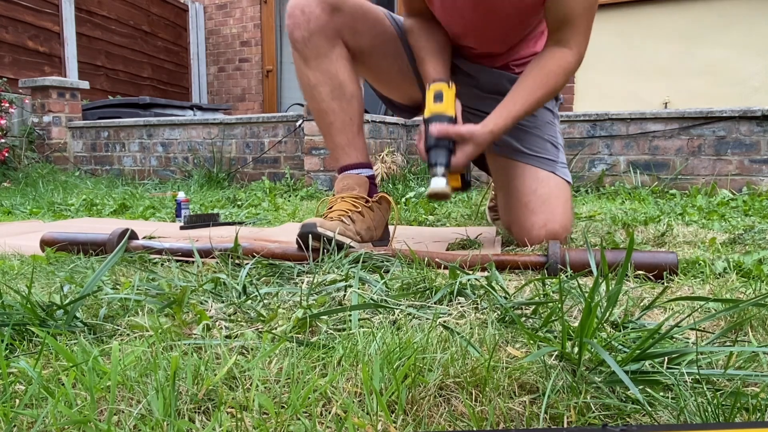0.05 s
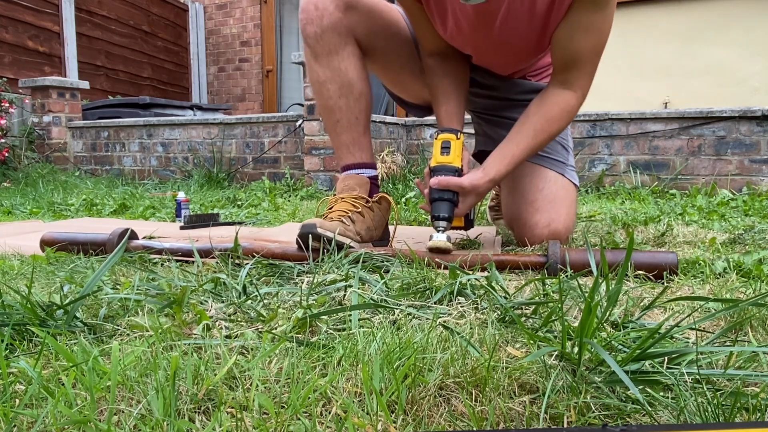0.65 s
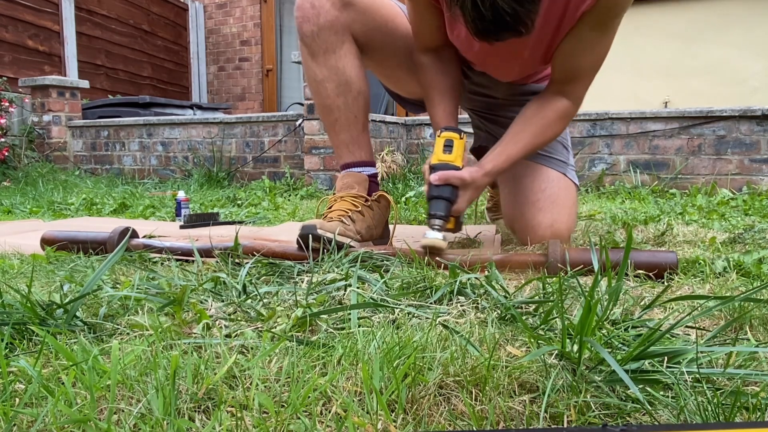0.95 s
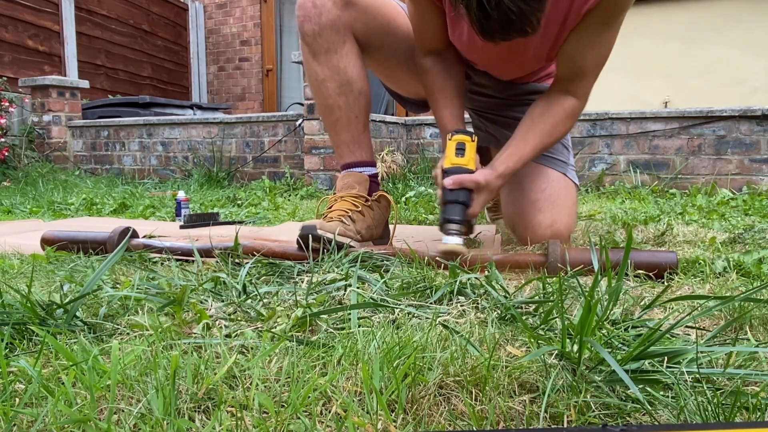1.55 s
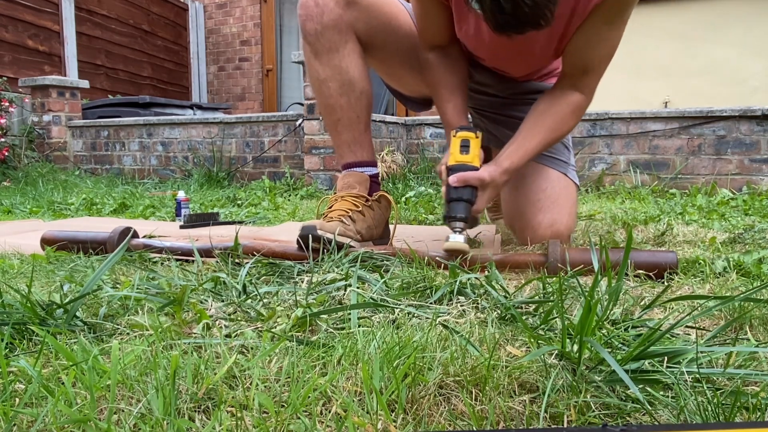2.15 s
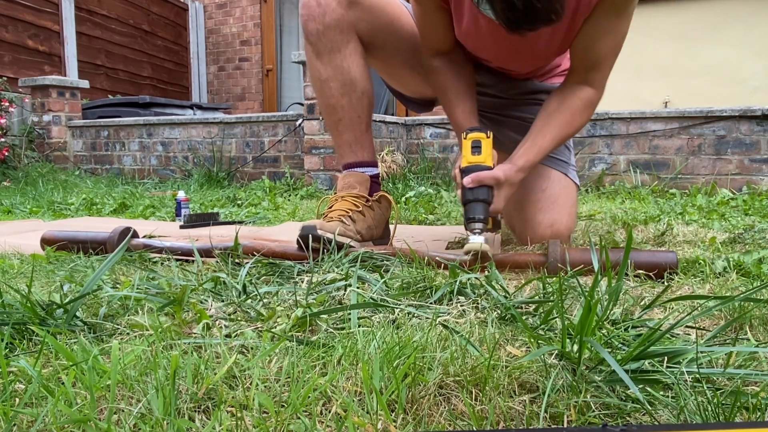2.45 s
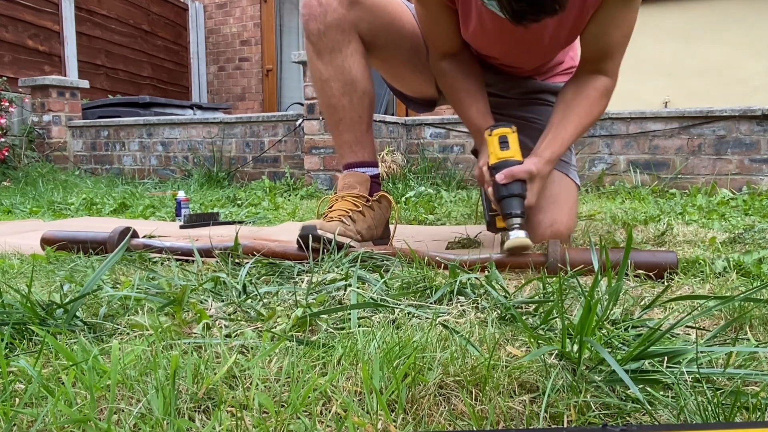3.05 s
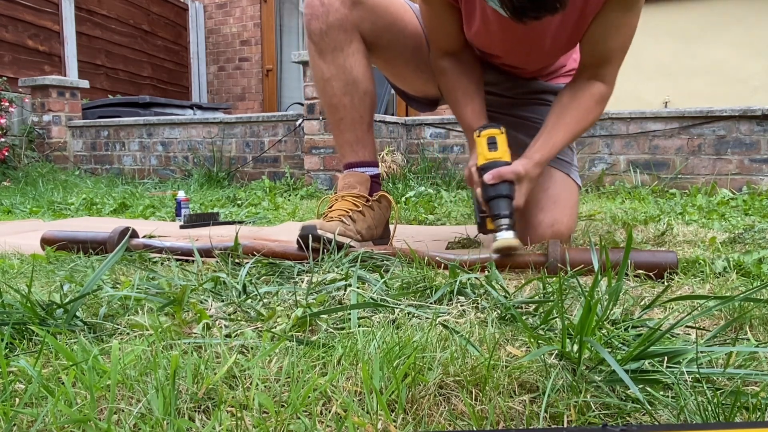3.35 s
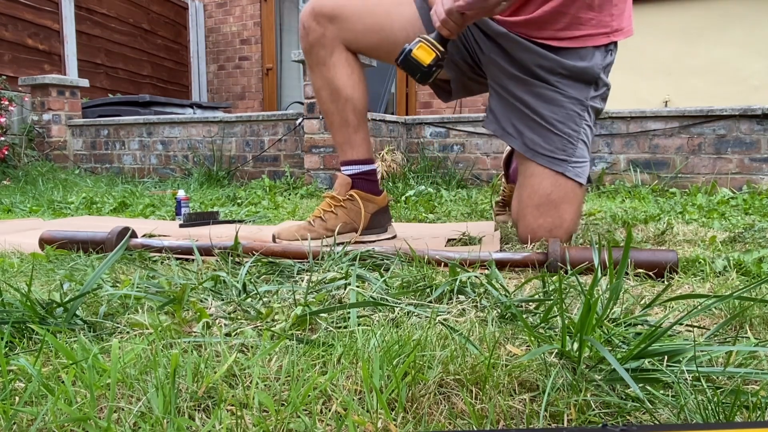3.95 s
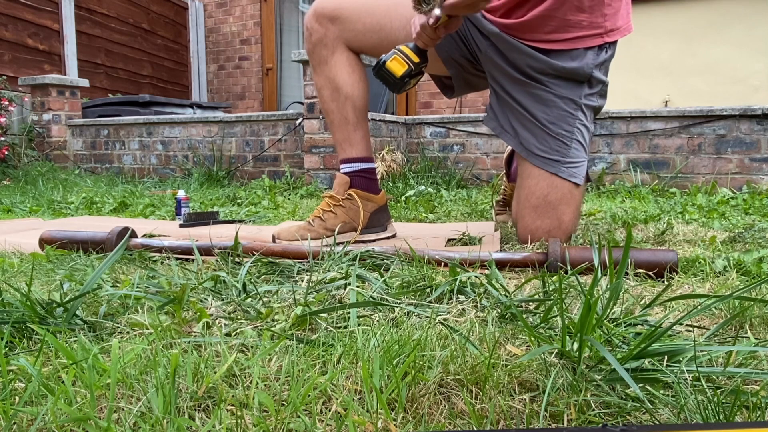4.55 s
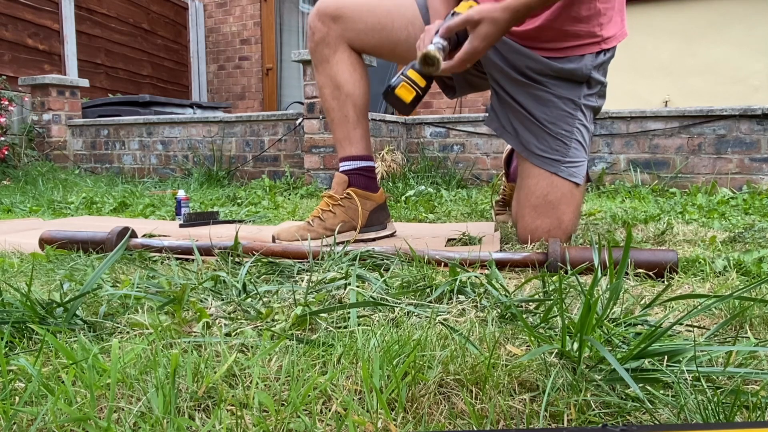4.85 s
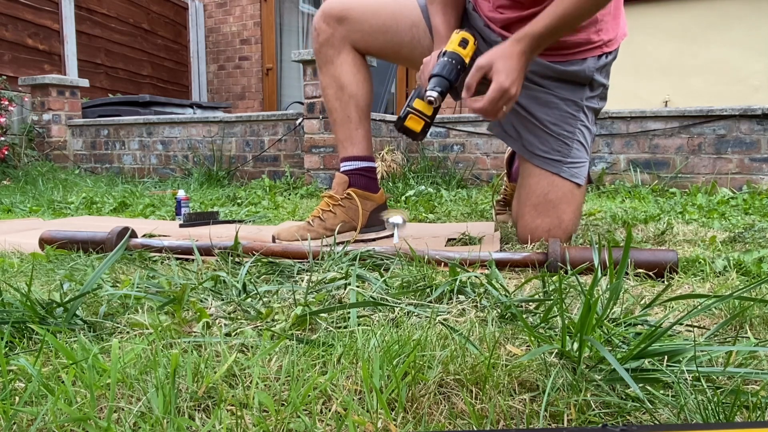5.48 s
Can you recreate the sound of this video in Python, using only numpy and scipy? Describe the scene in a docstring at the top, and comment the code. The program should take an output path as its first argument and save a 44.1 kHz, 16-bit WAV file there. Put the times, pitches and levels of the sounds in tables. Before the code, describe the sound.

Close to the microphone in a garden, a cordless drill starts with a click and runs for about three seconds, its high, wavering whine mixed with the gritty rasp of wire bristles on steel. It catches briefly with a rough tearing sound, then eases off and stops. Three quiet, clicking turns of the chuck follow, and the loose brush lands on a board with a thud and short metallic ring. Far traffic rumbles faintly.

```python
"""A garden, distant traffic rumbling; close to a stereo microphone, a rusty steel tube on a board.
Clothes rustle, a trigger clicks, and a cordless drill scours the tube with a wire cup brush, its motor
whining and throbbing under the uneven load. Once the brush snags on the board; later it lifts off and
runs free. The drill stops, the chuck is opened in three twists, and the brush drops on the board."""
import sys
import numpy as np
from scipy import signal
from scipy.fft import rfft, irfft, next_fast_len
from scipy.io import wavfile

SR = 44100
rng = np.random.default_rng(int(sys.argv[2]) if len(sys.argv) > 2 else 0)


def wav_out(sig):
    """Save sig, one row per channel (or a flat mono array), as 16-bit PCM at SR to the path in sys.argv[1]."""
    wavfile.write(sys.argv[1], SR, np.round(np.clip(np.atleast_2d(sig).T, -1, 1) * 32767).astype(np.int16))


N = 243431

TRIGGER_ON_S, TRIGGER_OFF_S = 0.821, 3.688
SNAG_START_S, SNAG_END_S = 1.541, 1.672
# the motor under the hand's pressure: time_s, pitch_hz, level_db, swing_hz (within a turn of the brush)
MOTOR_LOAD = [(0.825, 4170, -32, 10), (0.865, 3980, -35, 37), (1.0, 3924, -45, 26), (1.1, 3864, -40.3, 14),
              (1.28, 3993, -36.5, 44), (1.47, 3922, -39.0, 100), (1.6, 3933, -40.5, 10.2),
              (1.87, 4008, -33.5, 41), (1.98, 3903, -37, 5.6), (2.26, 4016, -34, 44), (2.38, 3870, -39, 8),
              (2.55, 4037, -34, 18.2), (2.8, 3937, -35.5, 18), (3.0, 3996, -36.5, 28),
              (3.23, 4002, -39, 47), (3.31, 3806, -40.5, 7.3), (3.35, 3640, -60, 24), (3.45, 4090, -49, 26),
              (3.55, 3790, -59, 15)]


def from_db(db):
    return 10 ** (np.asarray(db) / 20)


def rms_one(x):
    return x / np.sqrt(np.mean(x ** 2) + 1e-20)


def clock():
    return np.arange(N) / SR


def in_time(rows):
    """One curve for each column after the time."""
    times, *columns = np.transpose(rows)
    return [np.interp(clock(), times, column) for column in columns]


def between(start, end, fade):
    """One between two times, with short ramps outside."""
    return np.clip(1 + np.minimum(clock() - start, end - clock()) / fade, 0, 1)


def swell(start, length, rise_share, edge_db, attack_s=.012, release_s=.035):
    """Gain of a movement: it starts briskly, swells by edge_db and stops more softly."""
    since = clock() - start
    from_peak = np.interp(since / length, [0, rise_share, 1], [-1, 0, 1])
    gate = np.clip(1 + np.minimum(since / attack_s, (length - since) / release_s), 0, 1)
    return from_db(-edge_db * from_peak ** 2) * gate


def noise():
    """Two unrelated rows: sound common to both microphone ports, and sound that differs between them."""
    return rng.standard_normal((2, N))


def drift(rate_hz):
    """Slow wander with spread 1: random points, two for each cycle, joined by lines."""
    points = rng.standard_normal(N // 20)
    return rms_one(np.interp(clock() * 2 * rate_hz, np.arange(len(points)), points))


def grains(per_s, spread_db):
    """Tiny contacts at random times, with uneven strength."""
    sizes = from_db(spread_db * np.minimum(rng.exponential(1, (2, N)), 4)) * np.sign(noise())
    return rms_one(sizes * (rng.random((2, N)) < per_s / SR))


def impulses(rows):
    blows = np.zeros(N)
    for start_s, level_db in rows:
        blows[round(start_s * SR)] += from_db(level_db)
    return blows


def bursts(rows, t60_s):
    """A dying puff of noise for each contact."""
    decay = from_db(-60 / (t60_s * SR))
    return noise() * signal.lfilter([1], [1, -decay], impulses(rows) + 1e-18)


def coloured(x, tone, size=8192):
    """Minimum-phase filter of unit power gain: the tone table sets only the spectrum's shape."""
    hz = np.maximum(np.arange(size // 2 + 1) * SR / size, 1)
    tone_hz, tone_db = np.transpose(tone)
    gain = rms_one(from_db(np.interp(np.log(hz), np.log(tone_hz), tone_db)))
    cepstrum = irfft(np.log(gain))
    cepstrum[1:size // 2] *= 2
    cepstrum[size // 2 + 1:] = 0
    response = irfft(np.exp(rfft(cepstrum)))
    return signal.oaconvolve(x, response[None], axes=1)[:, :N]


def resonance(x, hz, width_hz):
    return signal.lfilter(*signal.iirpeak(hz, hz / width_hz, fs=SR), x)


def ring(rows, modes):
    """Each blow sets every mode ringing with a strength of its own."""
    out = 0
    for hz, mode_db, t60_s in modes:
        decay, step = from_db(-60 / (t60_s * SR)), 2 * np.pi * hz / SR
        blows = impulses([(s, db + mode_db + rng.normal(0, 1.4)) for s, db in rows]) + 1e-18
        out = out + signal.lfilter([0, np.sin(step)], [1, -2 * decay * np.cos(step), decay ** 2], blows)
    return out


def widen(x, side_db):
    """Common and differing sound to left and right."""
    return x[0] + from_db(side_db) * np.array([x[1], -x[1]])


def microphone_ports(x):
    """Close sound reaches the two ports out of step; scatter from the ground makes them less alike."""
    # the drill at the microphone: frequency_hz, left_lead_rad, left_over_right_db, likeness (0-1)
    arrival = [(100, .1, -2, .9), (650, .9, 3, .7), (1150, -.8, 3, .75), (1800, .1, -2.5, .92),
               (2500, 1.1, -3, .7), (4000, 2, -4, .7), (4900, 2.6, -3, .3), (5600, 4, 0, .25),
               (6500, 5.2, -3.5, .5), (8200, 3.14, 0, .85), (11000, 0, 0, .9), (13500, -3.14, 0, .85),
               (16000, -6.5, 0, .85)]
    size = 2 * next_fast_len(N // 2 + SR // 4, True)
    hz = np.arange(size // 2 + 1) * SR / size
    table_hz, *columns = np.transpose(arrival)
    lead, balance_db, alike = [np.interp(hz, table_hz, column) for column in columns]
    common, differing = rfft(x, size)
    side = np.array([[1], [-1]])
    pair = np.sqrt((1 + alike) / 2) * common + side * np.sqrt((1 - alike) / 2) * differing
    return irfft(pair * np.exp(.5j * side * lead) * from_db(side * balance_db / 2))[:, :N]


def open_air(level_db=-72):
    """Steady faint hush all around, unrelated at the two ports."""
    # spectrum of the hush: frequency_hz, level_db
    hush_tone = [(100, -1), (500, -1), (1000, -6.5), (2000, -16.5), (5000, -21.5), (11000, -27.5),
                 (16000, -40)]
    return from_db(level_db) * coloured(noise(), hush_tone)


def distant_traffic(gain_db=4, left_db=-4):
    """A low rumble from far off, nearly alike at both ports."""
    # level of the low background rumble, which steps up as the drill starts, then wavers: time_s, level_db
    rumble_level = [(0, -64), (.7, -63.5), (.95, -54.5), (3.6, -57.5), (4.05, -59.5), (4.55, -56.5),
                    (4.9, -61), (5.5, -54.5)]
    # spectrum of the rumble: frequency_hz, level_db
    rumble_tone = [(20, -37), (35, -8.5), (50, -3.5), (65, 4), (85, -2), (110, -0.5), (160, -13.5),
                   (250, -23), (500, -38.5), (1000, -52), (4000, -76)]
    rumble = widen(coloured(noise(), rumble_tone), side_db=-10)
    return from_db(gain_db + in_time(rumble_level)[0]) * rumble * from_db([[left_db], [0]])


def garden_echoes(x, tail_db=-20.5, tail_t60_s=.33):
    """The direct sound, a few wall echoes that cross sides, and a faint tail from the yard."""
    # house and garden walls: delay_s, level_db
    walls = [(.017, -20.5), (0.028, -24.5), (.043, -29.5)]
    out = x.copy()
    for delay_s, level_db in walls:
        lag = round(delay_s * SR)
        out[:, lag:] += from_db(level_db) * x[::-1, :-lag]
    tail = rng.standard_normal((2, SR)) * from_db(-60 * clock()[:SR] / tail_t60_s)
    tail /= np.linalg.norm(tail, axis=1, keepdims=True)
    return out + from_db(tail_db) * signal.fftconvolve(x, tail, axes=1)[:, :N]


def clothes():
    """Cloth rubs softly near the microphone as the worker leans forward."""
    # movements: start_s, length_s, rise_share, level_db
    moves = [(0, 0.057, 0.091, -69), (.185, .04, .3, -75), (.385, .43, .55, -66)]
    # spectrum of the cloth: frequency_hz, level_db
    rustle_tone = [(200, 4), (700, -0.5), (1800, -1), (3500, -9), (7000, -16.5), (11000, -22), (16000, -20)]
    rubbing = sum(from_db(db) * swell(*timing, edge_db=4) for *timing, db in moves)
    return coloured(rubbing * noise(), rustle_tone)


def chuck(whirr_gain_db=1, hum_gain_db=15.5, click_gain_db=-11.5, case_hz=1563, case_width_hz=340):
    """Slowly turning gears whirr and hum in one resonance of their case; lock ring and trigger click."""
    # gears coast once the trigger is let go: start_s, length_s, rise_share, whirr_db, hum_db
    coasting = [(3.69, 0.04, .5, -65, -57)]
    # the hand twists the chuck: start_s, length_s, rise_share, whirr_db, hum_db
    twists = [(4.058, .2, .7, -64, -57), (4.448, .24, .72, -58.5, -56), (5.103, .3, 0.15, -60, -61.5)]
    # clicks of chuck and trigger: start_s, strength_db
    clicks = [(0.3884, -51), (0.522, -55), (0.6604, -50.5), (0.8212, -27), (4.2168, -49), (4.4312, -31.5),
              (4.5784, -37.5), (4.6189, -42), (5.2535, -34.5)]
    # spectra of the whirr and the clicks: frequency_hz, level_db
    whirr_tone = [(300, -23.5), (1000, -14), (1400, -4), (1900, -4), (2500, 1.5), (3400, -7), (4400, -3),
                  (5600, -20), (7200, -6.5), (9000, -24), (11000, -11.5), (16000, -26)]
    click_tone = [(200, -8), (900, 1), (1400, 8), (4000, 2.5), (6000, -6), (11000, 8), (16000, -8)]
    teeth, moves = grains(per_s=5000, spread_db=3.4), [*coasting, *twists]
    jerk_db = 4 * drift(16)
    whirr_swell = sum(from_db(db + jerk_db / 2) * swell(*timing, edge_db=8.5) for *timing, db, _ in moves)
    hum_swell = sum(from_db(db + jerk_db) * swell(*timing, edge_db=6) for *timing, _, db in moves)
    whirr = from_db(whirr_gain_db) * coloured(teeth * whirr_swell, whirr_tone)
    hum = from_db(hum_gain_db) * teeth[:, ::-1] * hum_swell
    for _ in range(2):
        hum = resonance(hum, case_hz, case_width_hz)
    return whirr + hum + from_db(click_gain_db) * coloured(bursts(clicks, t60_s=.016), click_tone)


def dropped_brush(cup_db=-39.5, board_db=-34, crash_db=-28, tail_db=-49.5):
    """The loose brush thumps the board straight ahead; its cup rings and its wires rustle."""
    # the brush lands and rocks: start_s, strength_db
    contacts = [(5.384, -1.5), (5.3865, -2.5), (5.3925, -5.5), (5.396, -3), (5.401, -9), (5.422, -25),
                (5.477, -29)]
    # its body sinks onto the board just after the wires touch: start_s, strength_db
    thumps = [(5.388, -6.5), (5.392, -3.5), (5.3995, -5.5), (5.423, -17)]
    # modes of the steel cup and of the board on grass: pitch_hz, level_db, t60_s
    cup_modes = [(1100, -9, .12), (2855, -17, 0.16), (5800, -14, 0.12), (5880, -3.5, 0.13),
                 (6988, 5.5, 0.072), (9190, -18, 0.12), (9880, -6.5, 0.068), (12000, -15, 0.048)]
    board_modes = [(62.5, -11, 0.22), (132, -5.5, 0.12), (162, -5, 0.086), (259, -2, 0.12),
                   (320, 4.5, 0.089), (400, -8, .05), (730, 4, 0.036)]
    # spectrum of the wires landing: frequency_hz, level_db
    crash_tone = [(30, -25), (70, 3.5), (170, 7.5), (320, 7), (520, -2.5), (780, -1), (1400, -2),
                  (2500, -9), (4500, -20), (6500, -12.5), (8500, -13.5), (11000, -12), (16000, -24)]
    crash = from_db(crash_db) * bursts(contacts, t60_s=.026)
    tail = from_db(tail_db) * bursts(contacts, t60_s=.26)
    wires = widen(coloured(crash + tail, crash_tone), side_db=-5)
    cup = from_db(cup_db) * ring(contacts, cup_modes)
    board = from_db(board_db) * ring(thumps, board_modes)
    return cup + board + wires


def caught(attack_s=.014, sag_db_per_s=30.5, release_t60_s=.18):
    """Gain of the snag: the brush grabs the board at once, weakens and lets go."""
    held_s, after_s = np.maximum(clock() - SNAG_START_S, 0), np.maximum(clock() - SNAG_END_S, 0)
    fall_db = sag_db_per_s * held_s + 60 * after_s / release_t60_s
    return between(SNAG_START_S, TRIGGER_OFF_S, attack_s) * from_db(-fall_db)


def board_groan(level_db=-47.5, rough_db=5, grab_hz=223.3, sag_hz_per_s=430, overtone_ratio=1.8):
    """The caught board groans: two low, rough partials sink together."""
    held_s = np.clip(clock(), SNAG_START_S, SNAG_END_S) - SNAG_START_S
    phase = 2 * np.pi * np.cumsum(grab_hz - sag_hz_per_s * held_s) / SR
    gain = from_db(level_db + rough_db * drift(60)) * caught()
    return gain * (np.sin(phase) + from_db(-3) * np.sin(overtone_ratio * phase))


def tube_bumps(gain_db=3):
    """The spinning brush knocks dully against the tube."""
    # knocks: start_s, strength_db
    bumps = [(1.379, -46), (1.467, -33.5), (1.5, -32.5), (1.914, -34), (2.292, -38), (3.266, -39),
             (3.312, -35), (3.318, -39), (3.375, -38)]
    # spectrum of a knock: frequency_hz, level_db
    bump_tone = [(100, -10), (400, -1), (1000, 2.5), (1600, 1), (2700, -4.5), (4500, -6), (9000, -18.5),
                 (16000, -24.5)]
    return from_db(gain_db) * coloured(bursts(bumps, t60_s=.018), bump_tone)


def snag(tearing_db=-26.5, snap_gain_db=-9.5):
    """The rim of the brush catches the board: coarse tearing with sharp snaps."""
    # the strongest tufts of wire snap free: start_s, strength_db
    tufts = [(1.548, -9), (1.558, -12), (1.59, -7), (1.596, -11.5), (1.604, -10.5), (1.615, -10.5),
             (1.664, -14.5)]
    # spectrum of the snag: frequency_hz, level_db
    snag_tone = [(60, -19.5), (180, 3), (400, -1), (700, -3), (1500, 3.5), (2800, 6.5), (4500, 4),
                 (7000, -5.5), (10500, 2), (16000, -11.5)]
    tearing = from_db(tearing_db) * grains(per_s=4200, spread_db=3) * caught()
    snaps = from_db(snap_gain_db) * bursts(tufts, t60_s=.012)
    return coloured(tearing + snaps, snag_tone)


def gears(phase, rattle_db=-47, mesh_gain_db=1, play_hz=45, load_share=.39):
    """Tooth contacts rattle the case; play in the gears blurs their tones, which grow with the load."""
    # resonances of the gear case: pitch_hz, width_hz, level_db
    case_modes = [(1783, 100, 3.5), (1306, 260, -7.5), (3000, 250, -6.5)]
    # gear tones that follow the motor: ratio_to_whine, level_db
    mesh = [(.69, -60), (0.782, -50), (0.853, -48.5), (1.451, -53), (1.576, -59), (1.67, -50)]
    running = between(TRIGGER_ON_S, TRIGGER_OFF_S, .001)
    teeth = grains(per_s=3000, spread_db=3.3) * running
    rattle = rms_one(sum(from_db(db) * resonance(teeth, hz, width) for hz, width, db in case_modes))
    tones = sum(from_db(db) * (drift(play_hz) * np.cos(k * phase) + drift(play_hz) * np.sin(k * phase))
                for k, db in mesh)
    load_db = in_time(MOTOR_LOAD)[1]
    tones *= running * from_db(mesh_gain_db + load_share * (load_db - load_db.max()))
    return from_db(rattle_db) * rattle + tones * np.array([[1], [0]])  # tones are common to both ports


def wire_scrape(braking_hz, start_db=-37.5, ease_db_per_s=.56, bite_db_per_hz=.0443, snag_db=8.5):
    """Thousands of wire tips a second drag over the rust, hardest when they brake the motor."""
    # spectrum of wires on steel: frequency_hz, level_db
    wire_tone = [(30, -30), (80, -22.5), (200, -5.5), (600, -7.5), (950, -4), (1500, -5), (2200, -11),
                 (2600, 1), (3200, 4.5), (4500, -2.5), (5400, 1), (6400, 5.5), (7800, -10), (10000, -3.5),
                 (16000, -13.5)]
    lift_start_s, lift_length_s, lift_drop_db = 3.245, .2, 4
    lifted = np.clip((clock() - lift_start_s) / lift_length_s, 0, 1)
    hand_db = start_db - ease_db_per_s * (clock() - TRIGGER_ON_S) - lift_drop_db * lifted
    patchy_db = drift(130)
    pressure = from_db(hand_db + bite_db_per_hz * braking_hz + snag_db * caught() + patchy_db)
    tips = grains(per_s=16000, spread_db=2.5) * between(TRIGGER_ON_S, TRIGGER_OFF_S, .0012)
    return coloured(tips * pressure, wire_tone)


def shaft(whine_cycles_per_turn=243.82, flutter_hz=15.4):
    """The lopsided brush lets the motor surge once a turn: whine phase, swing, and braking after it."""
    pitch_hz, _, depth_hz = in_time(MOTOR_LOAD)
    turns = np.cumsum(pitch_hz) / SR / whine_cycles_per_turn
    # the snag bends the brush and shifts the beat: one crest of speed before it, one after
    crest_s = np.where(clock() < (SNAG_START_S + SNAG_END_S) / 2, 1.3964, 3.1103)
    angle = 2 * np.pi * (turns - np.interp(crest_s, clock(), turns))
    swing_hz, braking_hz = depth_hz * np.cos(angle), depth_hz * np.sin(angle)
    phase = 2 * np.pi * np.cumsum(pitch_hz + swing_hz + flutter_hz * drift(150)) / SR
    return phase, swing_hz, braking_hz


def motor_whine(phase, swing_hz, throb_db_per_hz=.08, right_db=8, left_lead_rad=1.68):
    """The motor's single tone, louder at each crest of speed and stronger at the right port."""
    flutter_db, waver_db = 1.23 * drift(96), 1.2 * drift(20)
    level_db = in_time(MOTOR_LOAD)[1] + throb_db_per_hz * swing_hz + flutter_db + waver_db
    gain = from_db(level_db) * between(TRIGGER_ON_S, TRIGGER_OFF_S, .001)
    return gain * np.array([np.sin(phase + left_lead_rad), from_db(right_db) * np.sin(phase)])


def scene():
    """Drill and handling close and just right of centre, the dropped brush ahead, the garden around."""
    phase, swing_hz, braking_hz = shaft()
    motor = motor_whine(phase, swing_hz)
    scouring = gears(phase) + wire_scrape(braking_hz) + snag() + tube_bumps()
    handling = clothes() + chuck()
    near = microphone_ports(scouring + handling) + dropped_brush() + motor + board_groan()
    return garden_echoes(near) + distant_traffic() + open_air()


def record(dry, low_cut_hz=36, high_cut_hz=15900):
    """The microphone drops the deepest bass; the top is cut steeply."""
    thinned = signal.sosfilt(signal.butter(4, low_cut_hz, "high", fs=SR, output="sos"), dry)
    return signal.sosfilt(signal.ellip(12, .1, 90, high_cut_hz, fs=SR, output="sos"), thinned)


dry = scene()
out = record(dry)
wav_out(out)
```